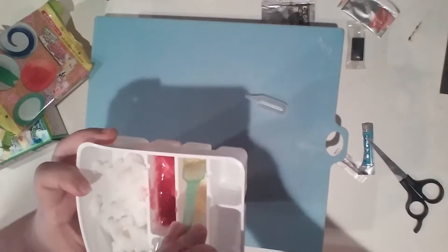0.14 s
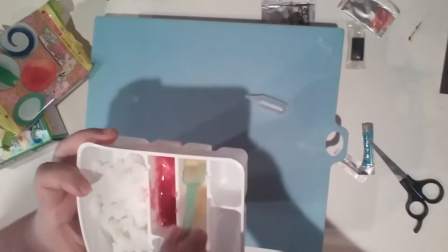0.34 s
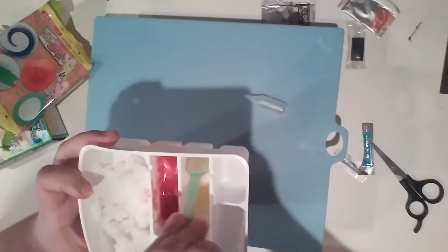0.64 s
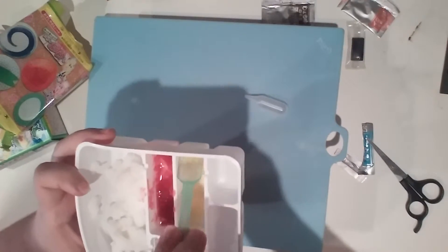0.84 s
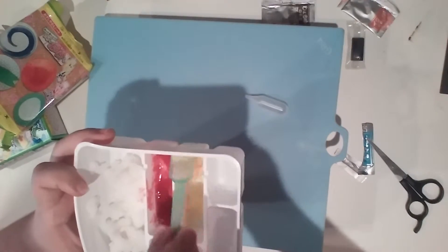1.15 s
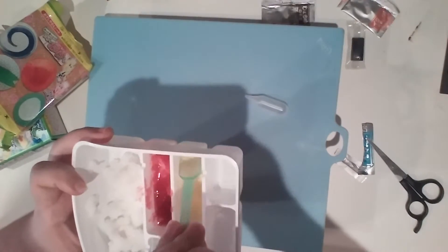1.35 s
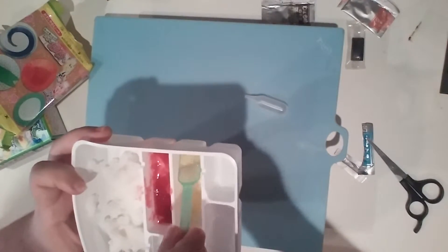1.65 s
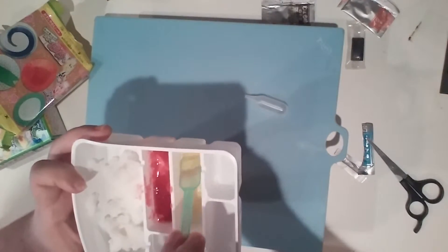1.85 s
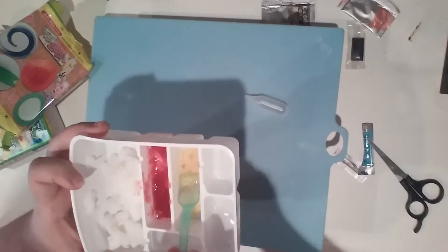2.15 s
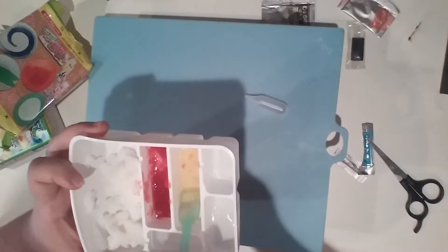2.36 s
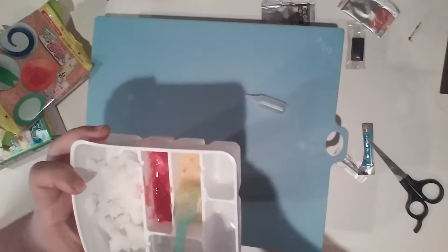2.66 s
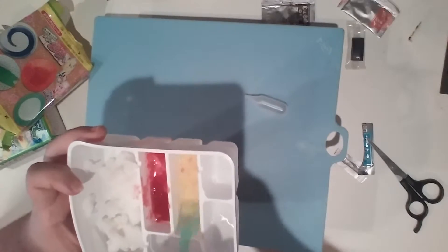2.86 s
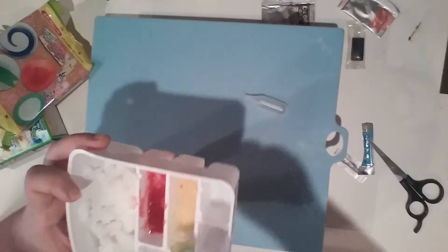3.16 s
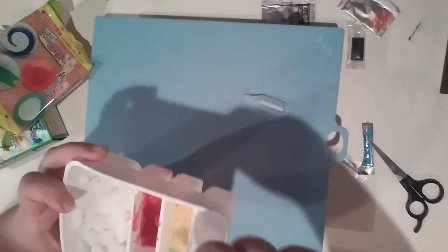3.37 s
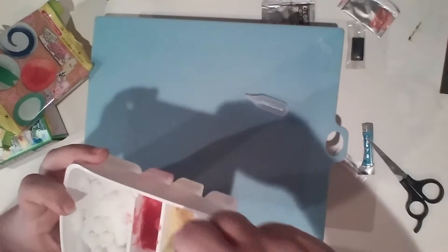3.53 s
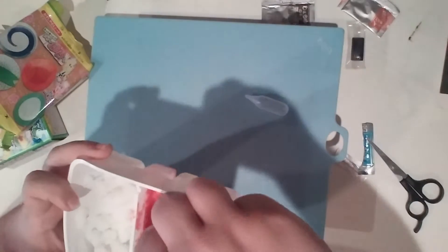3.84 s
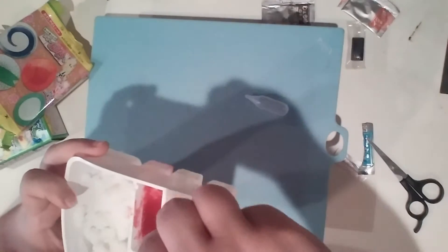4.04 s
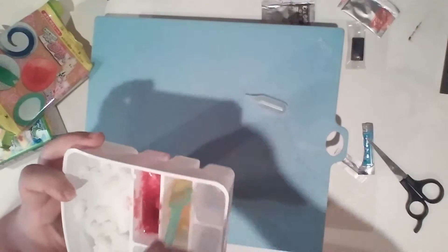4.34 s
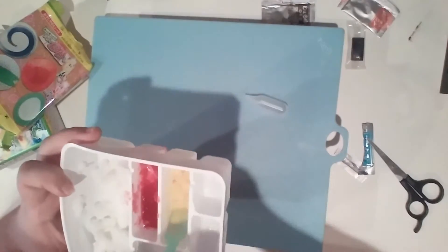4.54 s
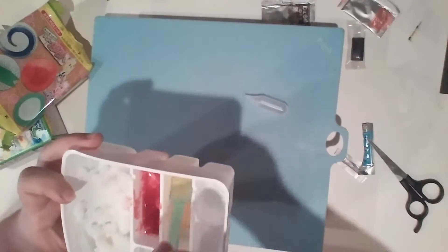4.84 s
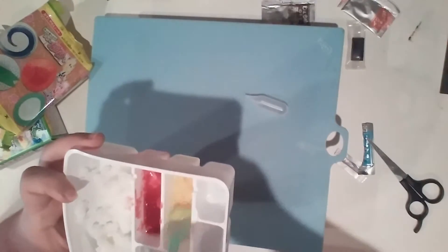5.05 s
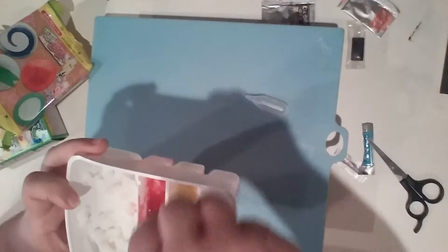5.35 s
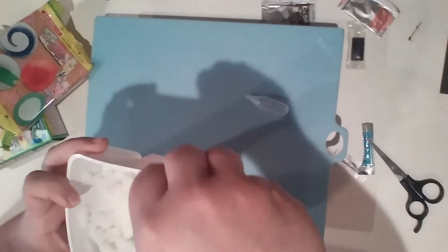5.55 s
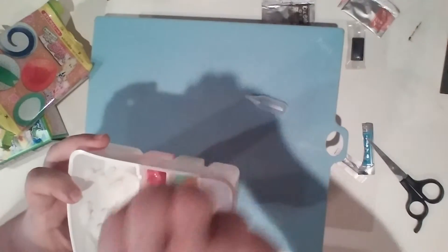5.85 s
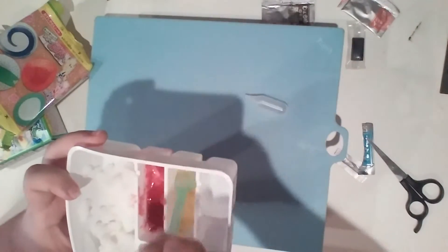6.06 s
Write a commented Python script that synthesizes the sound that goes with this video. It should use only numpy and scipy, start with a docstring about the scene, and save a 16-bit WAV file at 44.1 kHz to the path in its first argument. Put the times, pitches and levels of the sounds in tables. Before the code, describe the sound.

Indoors, in a small and fairly live room, a light plastic spoon works sticky wet paste in a thin plastic tray, heard close up in stereo. Quiet low rumble, a wavering low drone, faint mains hum and thin hiss lie beneath, slightly louder on the left. From 0 seconds, short crackly, hissing strokes and small taps follow quickly, growing firmer from 0.55. Bright, hollow knocks peak at 0.97-1.01, with more clacks near 1.2-1.28. Scraping fades by about 1.65; there is a near pause with a brief low drone swell around 2.15. Sparse wet dabs and soft ticks run from 2.2 to 3.1, then a faint stroke near 3.3. Sharp plastic knocks crack at 3.66-3.72 with a short scrape. After another lull, a stroke at 4.74 starts with a tiny squeak and knocks until about 4.93. Faint scrapes follow, a longer soft drag from 5.4 to 5.7, and a last light tick near 6.08.

```python
"""A small plastic spoon stirs wet candy paste in one compartment of a thin plastic tray held in the hand.
Throughout lie a low rumble, a wavering drone, a faint mains hum and hiss, all as noise or sines.
Strokes start at once: runs of tiny noise slips that hiss and ring the modes of the tray.
Knocks, short bursts into the same modes, peak near 1 s; sparser stirring follows, with hard knocks near 3.7 s.
At 4.74 s a stroke sets in with a squeak, then the stirring thins out; a small, fairly live room answers."""
import sys
import numpy as np
from scipy import signal
from scipy.fft import rfft, irfft
from scipy.io import wavfile
from scipy.ndimage import uniform_filter1d

SR = 44100
rng = np.random.default_rng(int(sys.argv[2]) if len(sys.argv) > 2 else 0)


def wav_out(sig):
    """Save sig, one row per channel (or a flat mono array), as 16-bit PCM at SR to the path in sys.argv[1]."""
    wavfile.write(sys.argv[1], SR, np.round(np.clip(np.atleast_2d(sig).T, -1, 1) * 32767).astype(np.int16))


N = 273420
SECONDS = np.arange(N) / SR
SIDES = np.array([[1], [-1]])  # left, right


def amp(db):
    """Decibels to gain."""
    return 10 ** (np.asarray(db) / 20)


def unit(x):
    """Scale to rms 1."""
    return x / np.sqrt(np.mean(x ** 2))


def burst(t60, seconds):
    """Two unrelated puffs of noise that die away by 60 dB in t60 seconds."""
    t = np.arange(int(seconds * SR)) / SR
    return rng.standard_normal((2, len(t))) * np.exp(-np.log(1000) * t / t60)


def band(x, lo, hi):
    """Steep causal band-pass."""
    return signal.sosfilt(signal.butter(4, [lo, hi], "band", fs=SR, output="sos"), x)


def resonance(x, hz, width):
    """Two-pole resonance, gain 1 at the centre."""
    return signal.lfilter(*signal.iirpeak(hz, hz / width, fs=SR), x)


def narrow_noise(shape, hz, width):
    """Noise through the same resonance twice: a tone that wavers by chance."""
    return resonance(resonance(rng.standard_normal(shape), hz, width), hz, width)


def shaped(x, points):
    """Give a sound the spectrum of (frequency [Hz], level [dB]) points."""
    hz, db = np.transpose(points)
    f = np.fft.rfftfreq(N, 1 / SR) + 1  # keeps the logarithm finite
    return irfft(rfft(x) * amp(np.interp(np.log(f), np.log(hz), db)), N)


# spectrum of the room rumble: (frequency [Hz], relative density [dB per Hz])
RUMBLE_SPECTRUM = [(13, -41.5), (22, -17.5), (49, -8.5), (106, -3.5), (141, -12.5), (204, -16), (252, -26),
                   (346, -22), (385, -30), (420, -24), (476, -31), (511, -31.5), (1500, -58.5),
                   (1950, -100), (3300, -120)]
# rumble level before trim: (time [s], level [dB])
RUMBLE_LEVEL = [(0.0, -50), (1.5, -49), (2.7, -49.5), (3.9, -51.5), (4.3, -58), (5.2, -53.5), (6.2, -53.5)]


def rumble(trim_db=-2):
    """Low noise of the room, nearly the same on both sides, its level drifting slowly."""
    mid, side = shaped(rng.standard_normal((2, N)), RUMBLE_SPECTRUM)
    side = shaped(side, [(60, -14.5), (300, -9.5), (4000, 0.0)])  # the sides differ more higher up
    air = unit(mid + SIDES * side)
    air = signal.sosfilt(signal.butter(2, 1200, fs=SR, output="sos"), air)
    level_db = np.interp(SECONDS, *np.transpose(RUMBLE_LEVEL))
    return air * amp(level_db + trim_db)


# swells of the low tones: (middle [s], half length to 1/e [s], peak level [dB])
DRONE_SWELLS = [(0.1, 0.57, -48.5), (2.155, 0.054, -47.5), (3.116, 0.079, -54)]


def drone_level(steady_db=-65):
    """Gain of the low tones: a steady level and a few bell-shaped swells, added as power."""
    power = amp(steady_db) ** 2
    for middle, half, db in DRONE_SWELLS:
        power = power + (amp(db) * np.exp(-((SECONDS - middle) / half) ** 2)) ** 2
    return np.sqrt(power)


# low tones of the room: (frequency [Hz], resonance width [Hz], relative level [dB])
DRONE_TONES = [(100.2, 60, 0.5), (137.9, 12, 0.5), (168, 9.9, -8), (197.8, 2.1, -8), (239.6, 4.3, -14)]


def drone():
    """Low room tones, made of narrow noise, so that they waver."""
    tones = sum(amp(db) * unit(narrow_noise(N, hz, width)) for hz, width, db in DRONE_TONES)
    return unit(tones) * drone_level()


# steady hum: (frequency [Hz], rms level before panning [dB])
HUM_TONES = [(60, -65), (96, -72)]


def hum():
    """Steady sines, each from a chance phase."""
    out = np.zeros(N)
    for hz, db in HUM_TONES:
        out += amp(db) * np.sqrt(2) * np.sin(2 * np.pi * (hz * SECONDS + rng.random()))
    return out


# spectrum of the microphone hiss: (frequency [Hz], relative density [dB per Hz])
MIC_HISS_SPECTRUM = [(1000, -3), (2500, -11), (4800, -11.5), (6300, -11.5), (8400, 1), (10000, -1.5),
                     (12500, -10.5), (15500, -21.5)]


def mic_hiss(level_db=-81):
    """Faint steady noise, unrelated on the two sides."""
    return unit(shaped(rng.standard_normal((2, N)), MIC_HISS_SPECTRUM)) * amp(level_db)


def background(pan_db=3.5):
    """Rumble, drone, hum and hiss together, a little louder on the left."""
    return (rumble() + drone() + hum() + mic_hiss()) * amp(SIDES * pan_db / 2)


def room(x, tail_t60=0.24, tail_db=-4.5, build_s=0.0013, desk_s=0.0077, desk_t60=0.0077, desk_db=-11, low_db=-4):
    """A scattered echo off the desk, then the tail of the room; both are weaker in the lows."""
    tail = burst(tail_t60, 1 / 2)
    tail = tail * (1 - np.exp(-(np.arange(tail.shape[1]) / SR / build_s) ** 2))
    desk = np.roll(burst(desk_t60, 1 / 2), int(desk_s * SR), axis=1)
    response = 0
    for echo, db in [(tail, tail_db), (desk, desk_db)]:
        response = response + amp(db) * echo / np.linalg.norm(echo, axis=1, keepdims=True)
    low = signal.sosfilt(signal.butter(1, 3000, fs=SR, output="sos"), response)
    response = response + (amp(low_db) - 1) * low
    return x + signal.fftconvolve(x, response, axes=1)[:, :N]


# resonances of tray and spoon: (frequency [Hz], width [Hz], relative level [dB])
MODES = [(862, 39, -3.5), (999, 110, -1.5), (1088, 160, -2.5), (1519, 32, -7.5), (1678, 33, -13),
         (1600, 15, -19), (2480, 120, -1), (2810, 95, -6), (3335, 130, -6.5), (3640, 47, -9),
         (4080, 20, -8.5), (4430, 13, -1), (5370, 110, -5), (5700, 130, -15), (6025, 370, -1.5),
         (6470, 240, -6), (7500, 530, -7), (8167, 150, 8), (8830, 440, 2), (8580, 160, -0.5),
         (9630, 710, -3), (11300, 370, -22), (11300, 5400, -18), (14900, 1200, -28.5)]


def tray(detune, uneven_db, size):
    """Impulse response of tray and spoon; each place of touch gives the modes its own weights, signs and tuning."""
    t = np.arange(size) / SR
    hz, width, db = np.array(MODES).T[:, :, None]
    weight, side, shift = rng.standard_normal((3, len(MODES), 1))
    gain = np.sign(side) * amp(db + uneven_db * weight) * width
    tones = np.sin(2 * np.pi * hz * (1 + detune * shift) * t)
    return np.sum(gain * np.exp(-np.pi * width * t) * tones, axis=0)


def spread(pair, index, alike=(.85, .3, .05, .02), pan_db=(-1.8, 4.0, 3.2, 3.8)):
    """Place a part: low ones reach both microphones alike; higher ones differ and lean left."""
    share = alike[index]
    pair = np.sqrt(1 + share) * pair[0] + SIDES * np.sqrt(1 - share) * pair[1]
    return pair * amp(SIDES * pan_db[index] / 2)


# ranges of tray floor, tray walls, spoon and contact tick, in this order: (from [Hz], to [Hz])
PART_RANGES = [(850, 1900), (1900, 4500), (4500, 7000), (7000, 17000)]


def part_of(ring, index):
    """One of the four parts, filtered out of the ring and placed."""
    return spread(band(ring, *PART_RANGES[index]), index)


def even(pair):
    """The hand holds the mean strength at 1; single slips scatter round it."""
    return pair / np.sqrt(uniform_filter1d(np.mean(pair ** 2, axis=0), size=1800))  # over 41 ms


def squeak(from_s=4.743, to_s=4.788, hz=1720, width_hz=60, peak_db=-50):
    """Plastic sticks and slips on plastic: one narrow note of the tray swells and fades as a stroke sets in."""
    note = narrow_noise((2, N), hz, width_hz)
    along = np.clip((SECONDS - from_s) / (to_s - from_s), 0, 1)
    swell = 2 * np.sqrt(along * (1 - along))
    return even(spread(note, 0)) * swell * amp(peak_db)


def strike(loudest_db, hard_t60=0.015, soft_s_per_db=1 / 3000, rattle_t60=0.059, rattle_db=-18):
    """Force of one knock: a sharp crack and a faint rattle; paste cushions weak knocks, so their crack lasts longer."""
    crack_t60 = hard_t60 + soft_s_per_db * np.clip(-26.0 - loudest_db, 0, None)
    return burst(crack_t60, 1 / 15) + amp(rattle_db) * burst(rattle_t60, 1 / 15)


def struck_ring(force, loudest_db, hz, damping_hz=15, snap_db=-58, favour_db=3, favour_width_hz=100):
    """The force rings the modes, with some wet snap and more of the note that the place of touch favours."""
    modes = tray(detune=.019, uneven_db=4.0, size=1536)
    modes = modes * np.exp(-np.pi * damping_hz * np.arange(len(modes)) / SR)  # the wet paste damps the ring
    ring = signal.fftconvolve(force, modes[None] / np.linalg.norm(modes), axes=1)
    # the snap of the paste has a smaller share in strong knocks: weak ones sound wet, strong ones ring
    ring[:, :force.shape[1]] += force * amp(min(snap_db - loudest_db, 0))
    return ring + amp(favour_db) * resonance(ring, hz, favour_width_hz)


EVEN_HZ = 1840  # a touch that favours lower notes than this rings the floor more, a higher one the walls
LEAN_DB_PER_OCT = 5  # taken from one, given to the other
# knocks of the spoon on the tray, levels before lean and trim:
# (time [s], tray [dB], spoon [dB], contact tick [dB], note favoured by the place of touch [Hz])
KNOCKS = [(0.016, -63.5, -78, -45.5, 2450), (0.099, -60, -72, -48, 1680), (0.133, -61, -67, -51, 2400),
          (0.327, -55, -59, -53, 1060), (0.505, -66, -74, -55.5, 1100), (0.575, -50.5, -58, -31, 3050),
          (0.655, -47, -67, -44, 1528), (0.678, -54.5, -65, -37, 900), (0.723, -57, -53.5, -40.5, 2470),
          (0.845, -54.5, -56, -44.5, 1520), (0.862, -49, -68, -38.5, 2450), (0.936, -50, -70, -43, 1507),
          (0.969, -33, -55, -33.5, 1770), (0.984, -33, -25.5, -26, 995), (1.0095, -50, -36.5, -27, 3280),
          (1.097, -51.5, -46.5, -44, 2620), (1.2015, -38, -41.5, -30.5, 1750), (1.234, -72, -55, -60, 2450),
          (1.262, -41, -57, -37, 1550), (1.276, -52.5, -51, -38.5, 1720), (1.592, -54, -65, -70, 1040),
          (1.632, -62.5, -66, -45.5, 2470), (1.789, -75, -61, -54, 2490), (2.167, -87, -86, -61.5, 1540),
          (2.221, -67.5, -72, -60, 1560), (2.366, -72.5, -54, -43, 970), (2.492, -70, -61.5, -48.5, 1570),
          (2.621, -62.5, -52.5, -61, 1550), (2.743, -59, -67, -49, 1080), (2.754, -58, -54.5, -49.5, 1590),
          (2.931, -56.5, -50.5, -37.5, 1557), (3.353, -65, -72, -48, 1945), (3.631, -68.5, -64, -50, 1540),
          (3.662, -57, -31, -28, 3330), (3.7143, -43, -26, -23, 1050), (3.721, -45, -38, -46, 3460),
          (3.816, -51.5, -48, -46.5, 1700), (4.766, -54, -44, -48, 1720), (4.816, -44.5, -41, -53, 1080),
          (4.834, -34.5, -37, -38.5, 1100), (4.86, -52.5, -46, -62, 2410), (5.237, -64, -61.5, -48, 1080),
          (5.667, -62.5, -58.5, -48.5, 2900), (6.078, -75.5, -66, -41.5, 2900)]


def knocks(rows=KNOCKS, trims_db=(0, .5, 1.5, 1.5), thud_hz=410, thud_width_hz=100, thud_db=-21):
    """Each knock rings floor, walls and spoon and makes a tick; the whole tray flexes with a weak thud."""
    out = np.zeros((2, N + SR))
    blow = int(.024 * SR)  # length over which the level of a knock counts
    for s, tray_db, spoon_db, tick_db, hz in rows:
        lean_db = LEAN_DB_PER_OCT * np.log2(hz / EVEN_HZ)
        levels = [tray_db - lean_db, tray_db + lean_db, spoon_db, tick_db]
        ring = struck_ring(strike(max(levels)), max(levels), hz)
        t = np.arange(ring.shape[1]) / SR
        thud = np.exp(-np.pi * thud_width_hz * t) * np.sin(2 * np.pi * thud_hz * t)
        hit = 2 * amp(levels[0] + thud_db) * thud
        for k, db in enumerate(levels):
            part = part_of(ring, k)
            # the blow gives each part a set energy
            hit = hit + part * amp(db + trims_db[k]) / np.sqrt(np.sum(part ** 2) / blow)
        start = int(s * SR)
        out[:, start:start + len(t)] += hit
    return out[:, :N]


def catches(hiss, ring, per_s=16, mean_db=-5.5, range_db=8, count=100):
    """Now and then the dragging spoon catches: a small knock in step with the stroke, at a chance place."""
    gap, place, size = rng.random((count, 3)).T
    times = np.cumsum(2 * gap) / per_s
    notes_hz = EVEN_HZ * 2 ** (2 * place - 1)  # within an octave either way
    extras_db = mean_db + range_db * (2 * size - 1)  # relative to the stroke
    rows = []
    for s, hz, extra_db in zip(times, notes_hz, extras_db):
        i = int(s * SR)
        if i < N and hiss[i] > 0:  # only within strokes
            tick_db, tray_db = 20 * np.log10([hiss[i], ring[i]]) + extra_db
            rows.append((s, tray_db, tray_db, tick_db, hz))
    return rows


# strokes of the spoon through the paste, levels before trim:
# (start [s], length [s], hiss of the paste [dB], ring of the tray [dB],
#  swell from start to end [dB], walls over floor [dB])
STROKES = [(0.005, 0.035, -47.5, -53, 6.5, -3.5), (0.04, 0.069, -54, -66.5, -11, 6),
           (0.12, 0.024, -53, -67, -5, 11), (0.151, 0.11, -50.5, -67, 3, 4), (0.27, .09, -57, -68.5, 10, 3),
           (0.406, .03, -50.5, -67, -9, 3), (0.501, .022, -54.5, -68.5, -3, -2),
           (0.564, .06, -44, -60, -1.5, 10), (0.626, .025, -37, -56.5, -1, 4),
           (0.661, .09, -45, -57.5, -2, 5.5), (0.844, .11, -45.5, -57.5, -3, 0.5),
           (0.953, 0.066, -40, -41.5, -3.5, 11.5), (1.021, .17, -47, -56.5, -11.5, 7.5),
           (1.193, .095, -47.5, -58, 15, -1), (1.294, .095, -51, -62.5, 10, -0.5),
           (1.409, .085, -67, -83, 3, 2), (1.491, .15, -54, -63, 2, 1),
           (2.204, .024, -57.5, -71, -2.5, -15), (2.324, .095, -59.5, -78, 12.5, 2),
           (2.489, .055, -50, -66, -8, -5), (2.617, .03, -48.5, -59.5, -10, -1),
           (2.723, .052, -53.5, -67.5, 3, -9), (2.88, .06, -54, -74.5, -20, -5),
           (2.941, .05, -45, -59.5, -0.5, 14), (2.981, 0.11, -51.5, -62.5, -18, 11.5),
           (3.272, .115, -53.5, -76, 0, 0), (3.518, .03, -59, -84.5, 0, 2),
           (3.614, 0.048, -51, -77, -1.5, -4.5), (3.725, .12, -47, -61.5, -6, 5.5),
           (4.419, .015, -71.5, -95.5, 0, -3), (4.653, .04, -64.5, -81.5, -8, 0),
           (4.742, .125, -44, -52, 0.5, 9), (4.86, .075, -48.5, -55.5, -10, 3.5),
           (4.94, .075, -71.5, -89, 3, -2), (5.128, .055, -64.5, -84, -4, -2),
           (5.23, .085, -56, -69, 3, -12), (5.315, .05, -64, -79, -3, -2),
           (5.403, .275, -59.5, -75.5, 8.5, -0.5), (6.073, .05, -50, -69.5, -3, -1)]


def drag(grip_s=.016, release_s=.009):
    """Gains of paste hiss, floor and walls: each stroke grips, swells or fades evenly, and lets go of the sticky paste."""
    power = np.zeros((3, N))
    for s, length, hiss_db, ring_db, swell_db, lean_db in STROKES:
        a, b = np.searchsorted(SECONDS, [s, s + length + 10 * release_s])
        age = SECONDS[a:b] - s
        shape = np.minimum(age / grip_s, 1) * np.exp(-np.maximum(age - length, 0) / release_s)
        shape = shape * amp(swell_db * (np.minimum(age / length, 1) - .5))
        levels = amp([[hiss_db], [ring_db - lean_db / 2], [ring_db + lean_db / 2]])
        power[:, a:b] += (levels * shape) ** 2
    return np.sqrt(power)


def slip_force(slips_per_s=800, scatter_db=1.5, slip_t60=.014, smear_db=-10):
    """Dense uneven slips, every one a tiny crackle of its own, over a smooth wet smear."""
    slips = (rng.random(N) < slips_per_s / SR) * amp(scatter_db * rng.standard_normal(N))
    t = np.arange(SR // 50) / SR
    decay = np.exp(-2 * np.log(1000) * t / slip_t60)  # of power
    power = np.maximum(signal.fftconvolve(slips ** 2, decay)[:N], 0)
    return (unit(np.sqrt(power)) + amp(smear_db)) * rng.standard_normal((2, N))


def travel(force, size=2600):
    """As the spoon moves on, its force passes through an ever-changing mix of the tray's modes."""
    out = np.zeros((2, N + SR))
    for start in range(0, N - size // 2, size // 2):  # overlapping places of touch
        piece = force[:, start:start + size]
        piece = piece * signal.windows.cosine(size)[:piece.shape[1]]
        modes = tray(detune=.02, uneven_db=2.5, size=size)
        ring = signal.fftconvolve(piece, modes[None], axes=1)
        out[:, start:start + ring.shape[1]] += ring
    return out[:, :N]


# spectrum of the paste hiss: (frequency [Hz], relative density [dB per Hz])
PASTE_SPECTRUM = [(2500, -41), (4300, -17.5), (5000, -21), (6100, -13), (7000, -6), (8100, 0.5),
                  (9400, -0.5), (10200, -2), (11000, -8), (13000, -13.5), (15500, -19.5)]


def scrape(hiss, floor, walls, squish_db=-9, trims_db=(-1, -1, -7), paste_db=3.0,
           flex_hz=390, flex_width_hz=160, flex_db=-11):
    """The spoon drags through the paste: its slips hiss, ring floor, walls and spoon, and flex the tray."""
    force = slip_force()
    ring = unit(travel(force)) + amp(squish_db) * unit(force)
    out = even(spread(shaped(force, PASTE_SPECTRUM), -1)) * hiss * amp(paste_db)
    for k, gain in enumerate([floor, walls, np.sqrt(hiss * walls)]):
        out = out + even(part_of(ring, k)) * gain * amp(trims_db[k])
    flex = unit(resonance(force[0], flex_hz, flex_width_hz))
    return out + flex * floor * amp(flex_db)


def scene():
    """Spoon and tray answered by the room, over the background."""
    hiss, floor, walls = drag()
    small_knocks = knocks(catches(hiss, np.sqrt(floor * walls)))
    spoon = squeak() + knocks() + small_knocks + scrape(hiss, floor, walls)
    return background() + room(spoon)


def record(dry, top_hz=15800):
    """The recorder cuts the top with a steep low-pass."""
    return signal.sosfilt(signal.ellip(10, .2, 80, top_hz, fs=SR, output="sos"), dry)


dry = scene()
out = record(dry)
wav_out(out)
```